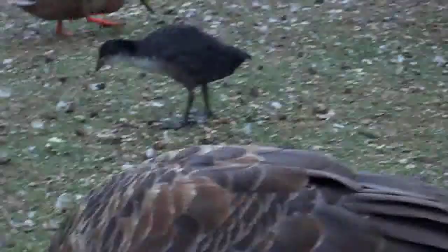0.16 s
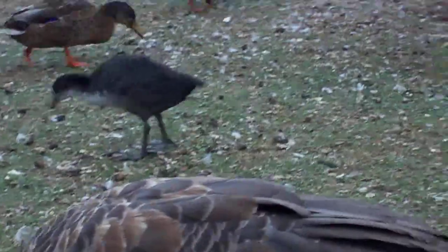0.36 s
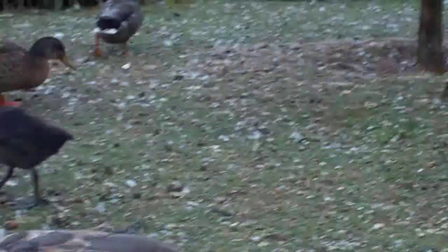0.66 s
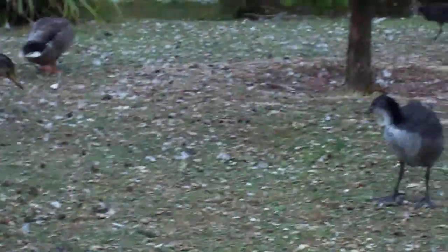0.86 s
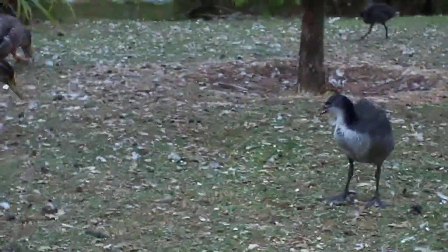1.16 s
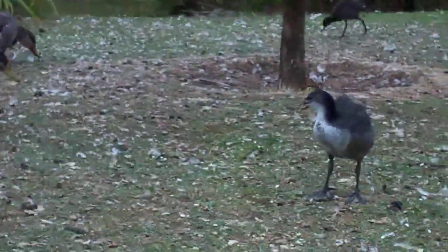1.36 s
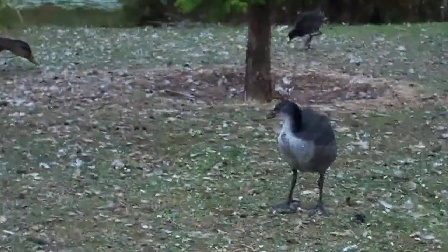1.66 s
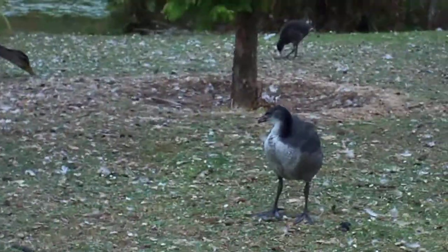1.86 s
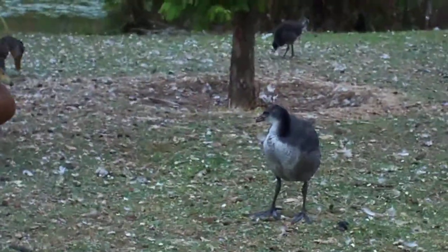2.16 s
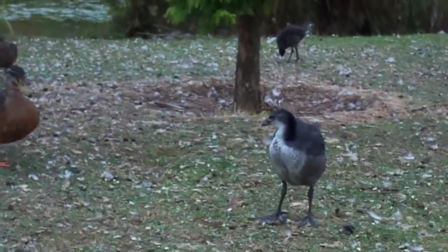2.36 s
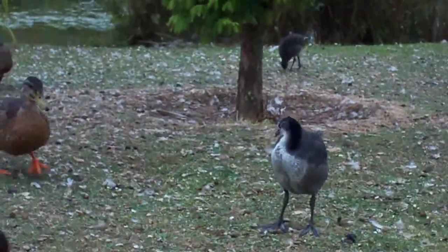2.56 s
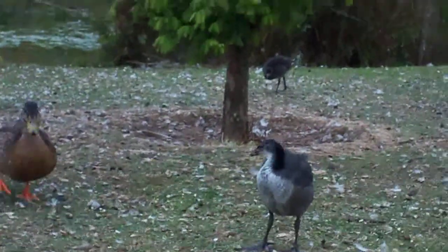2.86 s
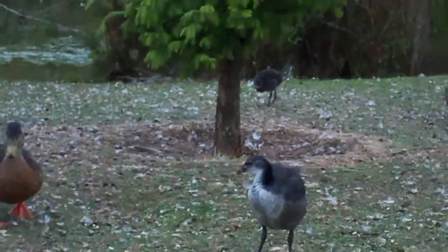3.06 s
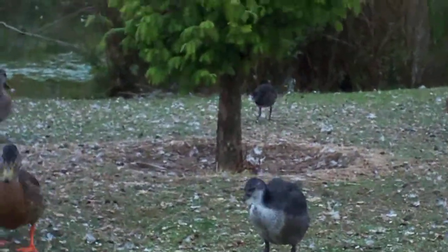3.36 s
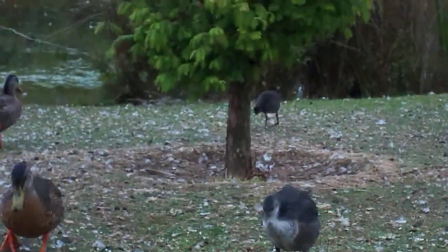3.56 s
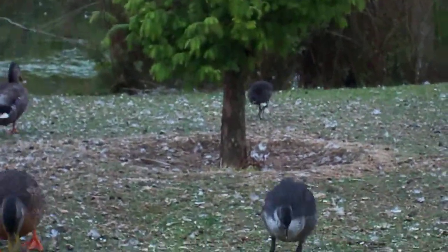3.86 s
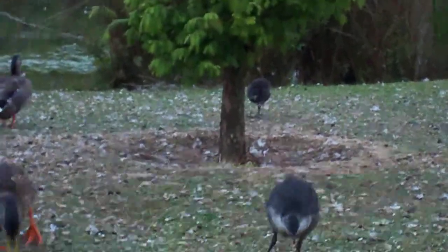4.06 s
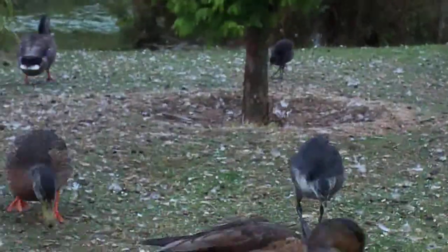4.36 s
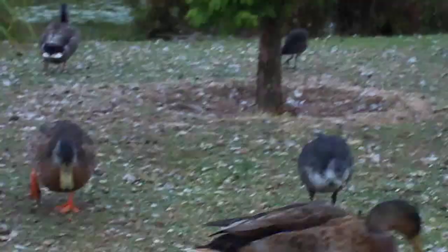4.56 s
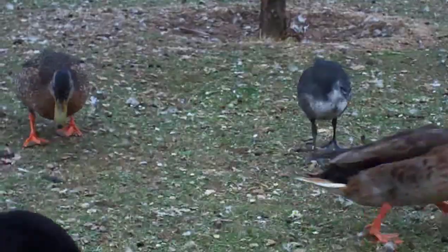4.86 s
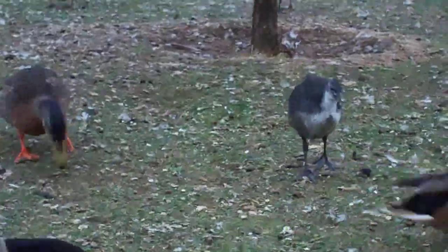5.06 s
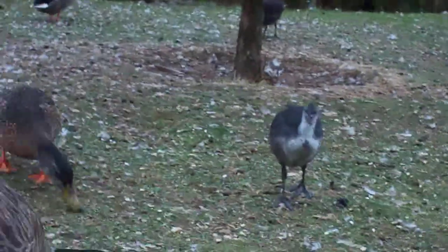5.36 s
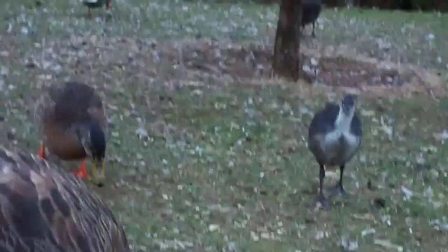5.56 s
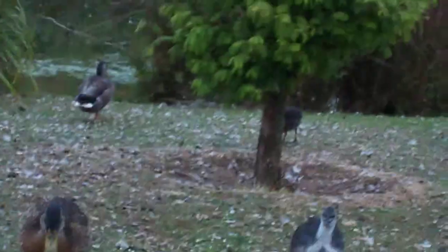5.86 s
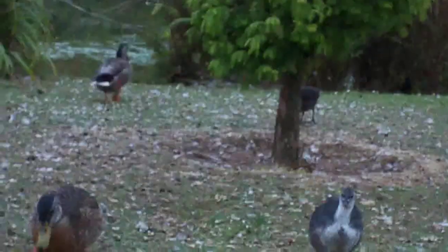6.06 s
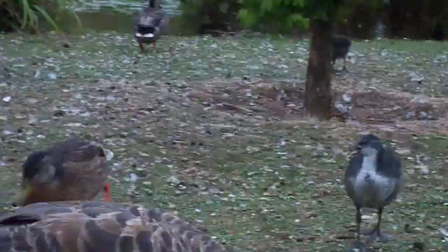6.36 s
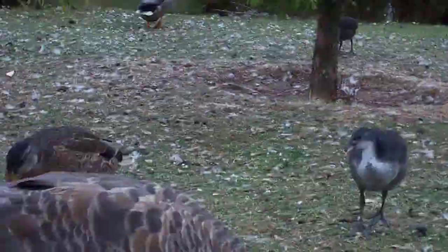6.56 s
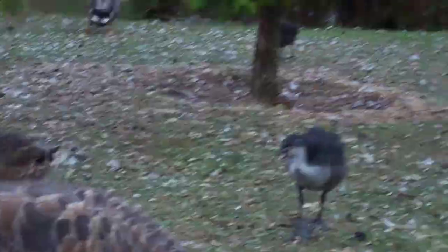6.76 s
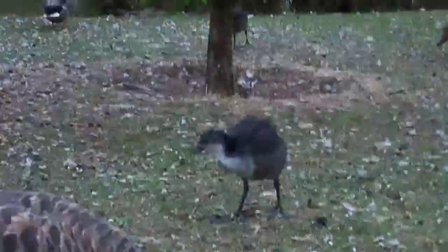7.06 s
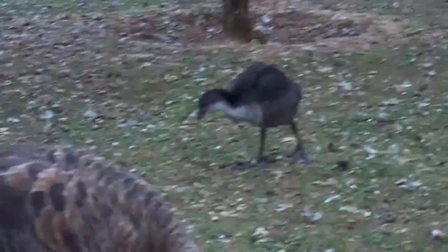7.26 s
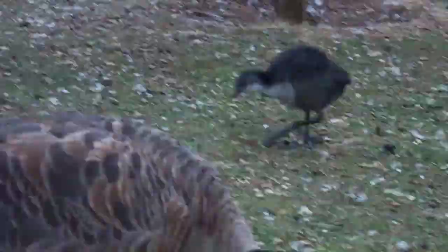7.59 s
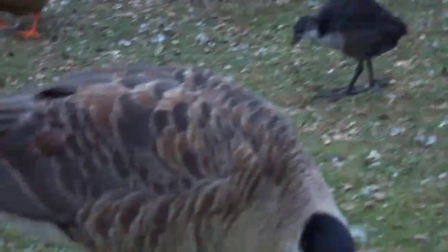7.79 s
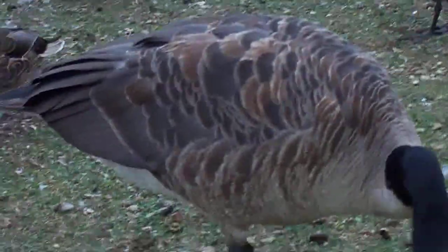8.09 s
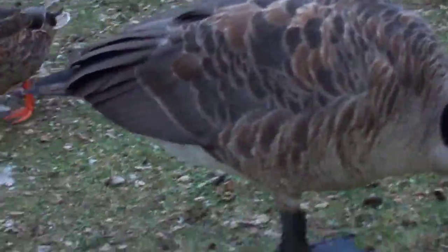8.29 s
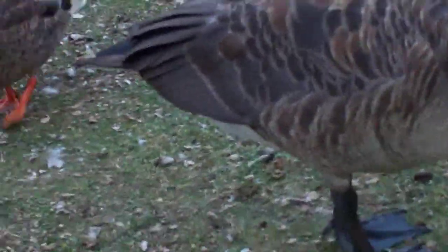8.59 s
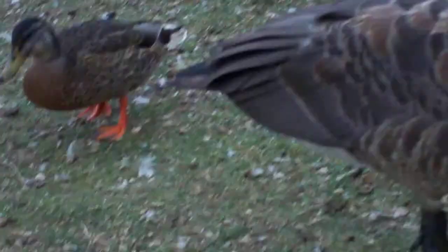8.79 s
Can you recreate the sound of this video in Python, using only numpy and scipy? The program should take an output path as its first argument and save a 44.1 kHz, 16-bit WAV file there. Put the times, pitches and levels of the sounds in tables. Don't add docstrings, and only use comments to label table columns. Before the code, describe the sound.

Young coots beg with rising whistles that rasp and drop, ducks grunt, a bill snaps, then a goose tears grass close by over low rumble.

```python
import sys
import numpy as np
from scipy import signal
from scipy.fft import rfft, irfft
from scipy.io import wavfile
from scipy.ndimage import uniform_filter1d, minimum_filter1d

SR = 44100
rng = np.random.default_rng(int(sys.argv[2]) if len(sys.argv) > 2 else 0)


def invert_db(x):
    u = np.asarray(x, float) / 20
    return 10 ** u


def store_pcm(level_fs):
    pcm = np.round(np.clip(level_fs, -1, 1) * 32767).astype(np.int16)
    wavfile.write(sys.argv[1], SR, np.atleast_2d(pcm).T)


N = 393792
T = np.arange(N) / SR

# (start [s], end [s], centre of the wandering pitch [Hz], level at the end [dB], air [dB])
RASPS = [(0.382, 0.41, 2880, -58.5, 11.5), (0.429, 0.522, 2790, -55, 6), (0.506, 0.621, 2950, -44, 0),
         (0.605, 0.774, 3204, -42, 1.5), (1.101, 1.265, 3540, -43, 0), (1.244, 1.451, 3760, -41, 1),
         (1.502, 1.558, 2470, -59.5, 8.5), (2.819, 2.89, 3140, -55.5, 10.5),
         (2.878, 3.124, 2965, -39.5, 5.5), (3.112, 3.17, 2970, -34, 6), (4.274, 4.362, 3550, -51, 9.5),
         (4.338, 4.526, 2690, -52, 13.5), (4.518, 4.555, 3530, -60, 13), (4.627, 4.676, 3410, -55, 6),
         (4.697, 4.941, 3640, -39.5, -1.5), (4.924, 5.038, 3510, -41, -3), (5.38, 5.566, 2750, -45, 2.5),
         (5.554, 5.727, 2863, -37, 3.5), (6.454, 6.806, 3640, -42, 3.5), (8.059, 8.393, 3010, -40.5, 11.5),
         (8.495, 8.594, 3520, -56.5, 12.5), (8.61, 8.83, 3170, -57.5, 0)]
CHICK_RISE_S = 0.04


def band(x, hz, width, order=1):
    edges = [max(hz - width / 2, 10), min(hz + width / 2, 0.45 * SR)]
    return signal.sosfilt(signal.butter(order, edges, "band", fs=SR, output="sos"), x)


def unit(x):
    return x / np.sqrt(np.mean(x ** 2))


def walk(rate, size=N):
    k = int(SR / rate)
    steps = np.repeat(rng.standard_normal(size // k + 2), k)
    return 1.286 * uniform_filter1d(uniform_filter1d(steps, k), k)[:size]


def colour(x, points):
    hz, db = np.transpose(points)
    bins = np.fft.rfftfreq(len(x), 1 / SR) + 1
    gain = invert_db(np.interp(np.log(bins), np.log(hz), db, -120, -120))
    return unit(irfft(rfft(x) * gain, len(x)))


def background():
    # (frequency [Hz], level [dB per Hz])
    lawn = [(82, -21.5), (140, 2), (212, -1), (280, -5.5), (601, -16.5), (656, -15.5), (740, -13.5),
            (2370, -26), (7310, -27), (8850, -30.5), (11500, -68), (19500, -120)]
    # (time [s], traffic below 90 Hz [dB], hum near 110 Hz [dB])
    rumble = [(0.0, -40.5, -55), (0.32, -38.5, -46.5), (0.4, -41.5, -67), (0.67, -40, -47.5),
              (1.41, -50, -45.5), (1.54, -38.5, -51.5), (2.19, -49.5, -44.5), (2.39, -48, -53.5),
              (3.68, -49, -43.5), (4.63, -43.5, -41), (6.91, -50.5, -58), (6.96, -54, -49.5),
              (7.44, -42, -42), (7.61, -44.5, -50), (8.58, -47.5, -46), (8.93, -46.5, -59)]
    s, road_db, hum_db = np.transpose(rumble)
    hiss = colour(rng.standard_normal(N), lawn) * invert_db(-50.5 + walk(8.7))
    road = unit(band(rng.standard_normal(N), 56.3, 36, order=2))
    wind = unit(band(rng.standard_normal(N), 28, 50, order=2)) * invert_db(-43 + 0.8 * walk(2))
    hum = np.sqrt(2) * np.sin(2 * np.pi * np.cumsum(110.6 + 1.286 * walk(3.7)) / SR)
    hum = hum + 0.5 * unit(band(rng.standard_normal(N), 108.0, 36, order=2))
    road = invert_db(np.interp(T, s, road_db) + 2.54) * road
    return hiss + wind + road + invert_db(np.interp(T, s, hum_db) + 0.5) * hum


def clicks(events, cycles, scatter, tail, contact_s=0.0001):
    out, t = np.zeros(N + 4000), np.arange(4000) / SR
    for s, db, hz in events:
        contact = -np.expm1(-(t / contact_s) ** 2)
        ring = np.sin(2 * np.pi * hz * t) * np.exp(-t * hz / cycles) * contact
        burst = scatter * np.diff(rng.standard_normal(len(t) + 1)) * np.exp(-t / tail)
        start = int(s * SR)
        out[start:start + len(t)] += invert_db(db) * (ring + burst)
    return out[:N]


def feet_and_bills():
    # (time [s], peak [dB])
    taps = [(0.483, -41), (0.816, -34), (1.682, -51), (2.277, -36), (3.762, -33.5), (4.031, -37),
            (4.31, -48), (4.648, -39)]
    # (time [s], peak [dB])
    ticks = [(1.739, -40), (1.8397, -36.5), (2.5486, -39), (2.609, -33.5), (3.565, -37.5), (3.763, -41),
             (3.911, -37.5), (3.987, -34.5), (4.04, -41), (4.052, -43), (5.152, -44), (5.166, -44.5),
             (5.228, -33), (6.115, -40.5), (6.2103, -50)]
    # (time [s], peak [dB], ring [Hz])
    snap = [
        (4.2219, -25, 1560),
        (4.2237, 11, 3490),
        (4.2252, -33, 3800),
        (5.288, -21, 2500),
    ]
    # (time [s], peak [dB], ring [Hz])
    thuds = [
        (4.2225, -23, 960),
        (4.223, -27, 220),
        (7.386, -23.5, 95.6),
        (8.603, -21, 620),
        (8.633, -23, 534),
    ]
    sound = clicks([(s, db, 950) for s, db in taps], 1.0, 0.05, 0.002)
    sound += clicks([(s, db, 5500) for s, db in ticks], 0.85, 0.45, 0.0036)
    sound += clicks(snap, 0.75, 0.011, 0.0018, contact_s=0.0003)
    return sound + clicks(thuds, 1.47, 0, 0.002)


def tearing():
    # (time [s], peak [dB], ring [Hz])
    tears = [(6.2441, -47, 1910), (6.2533, -36.5, 1020), (6.254, -25, 3820), (6.2797, -21, 3720),
             (6.3243, -26, 2160), (6.828, -27.5, 2410), (6.8955, -32.5, 1160), (6.9472, -22.5, 6840),
             (6.9556, -20.5, 4100), (6.973, -28, 2170), (6.9986, -13, 6920), (7.0475, -33.5, 1160),
             (7.0637, -31, 1000), (7.063, -31, 1270), (7.0926, -28, 2010), (7.112, -26.5, 3070),
             (7.1368, -14.5, 6900), (7.1428, -18.5, 3660), (7.1706, -29.5, 2510), (7.2083, -26.5, 2850),
             (7.2443, -18, 6200), (7.267, -19.5, 3510), (7.3005, -22.5, 4800), (7.3375, -20.5, 3740),
             (7.3568, -27, 2770), (7.411, -27.5, 1180), (7.4304, -18, 6870), (7.481, -33, 1380),
             (7.5417, -33.5, 6780), (7.5426, -24.5, 4500), (7.56, -24, 2160), (7.625, -21.5, 4650),
             (7.6387, -22, 2940), (7.683, -21.5, 5630), (7.6985, -19, 4330), (7.7289, -24.5, 4200),
             (7.744, -19.5, 4900), (7.774, -19.5, 5010), (7.8023, -39, 1010), (7.8023, -11.5, 6670),
             (7.8312, -27.5, 4800), (7.8806, -20, 5370), (7.909, -22.5, 4560), (7.929, -22, 2650),
             (6.9002, -22, 2960), (6.921, -23.5, 5500), (7.0087, -17.5, 6800), (7.028, -27.5, 4000),
                  (7.152, -24.5, 3500), (7.318, -25.5, 6500), (7.381, -22.5, 6800), (7.3908, -18, 4800),
                  (7.44, -23, 7500), (7.501, -25, 6000), (7.577, -24, 6500), (7.633, -23.5, 7300),
                  (7.7935, -22.5, 6500), (7.845, -24, 5000), (7.874, -30.5, 4500), (7.891, -32, 6000),
                  (7.947, -28, 3500), (7.958, -27.5, 6500), (7.972, -19, 2500), (7.982, -28.5, 7200),
             (8.011, -33.5, 4940), (8.078, -29.5, 7000), (8.099, -34.5, 4500), (8.145, -34.5, 6000),
                  (8.593, -16.5, 4880), (8.602, -21, 2050), (8.609, -26, 3980), (8.628, -20.5, 4870),
                  (8.633, -26.5, 2630), (8.64, -34.5, 4500)]
    return clicks(tears, 2.1, 0.78, 0.00081)


def grazing():
    fibre_hz = [500, 1300, 2600, 4400, 6800]
    # (frequency [Hz], level [dB per Hz])
    grass = [(120, -49), (200, 1.5), (279, -8.5), (645, -10.5), (1320, -6), (1750, -8.5), (2950, -7.5),
             (7160, -9.5), (8800, -17), (11400, -60.5), (19400, -120)]
    # (start [s], end [s], level [dB])
    bouts = [(6.24, 6.287, -50), (6.317, 6.535, -53.5), (6.548, 6.882, -45.5), (6.886, 6.936, -40),
             (6.94, 6.991, -47), (6.99, 7.018, -48.5), (7.045, 7.06, -62), (7.051, 7.128, -46),
             (7.128, 7.184, -41.5), (7.194, 7.351, -43.5), (7.347, 7.388, -39), (7.393, 7.524, -41.5),
             (7.524, 7.595, -42.5), (7.597, 7.645, -49), (7.633, 7.707, -42.5), (7.713, 7.745, -56),
             (7.734, 7.85, -42.5), (7.856, 7.877, -49), (7.88, 7.992, -46.5), (7.993, 8.343, -49.5),
             (8.33, 8.596, -52), (8.584, 8.847, -46), (8.593, 8.619, -35.5), (8.621, 8.643, -32.5)]
    # (time of peak [s], level [dB], build-up [s])
    tugs = [(6.279, -42, 0.018), (6.338, -43.5, 0.005), (6.782, -36.5, 0.084), (6.829, -40.5, 0.012),
            (7.009, -41.5, 0.0045), (7.066, -46, 0.0043), (7.146, -41.5, 0.0025), (7.27, -46, 0.008),
            (7.547, -38, 0.012), (7.7, -43.5, 0.011), (7.805, -50, 0.01), (7.962, -32, 0.03),
            (8.1, -41.5, 0.0053)]
    tug_decay_s = 0.036
    crackle = 0
    for hz in fibre_hz:
        chance = rng.random((3, N))
        parted = chance[0] < 700 / SR
        fibres = parted * np.sign(chance[1] - 0.5) * invert_db(-3 * np.log(chance[2] + 0.05))
        rough = unit(fibres) + 0.25 * rng.standard_normal(N)
        crackle = crackle + band(rough, hz, 0.7 * hz) * invert_db(2.5 * walk(120))
    rustle = colour(crackle, grass) * invert_db(3.2 * walk(300))
    pull = uniform_filter1d(sum(invert_db(db) * ((T > s) & (T < end)) for s, end, db in bouts), size=200)
    for s, db, build in tugs:
        pull = pull + invert_db(db) * np.exp(np.minimum((T - s) / build, (s - T) / tug_decay_s))
    return pull * rustle


def unrest():
    mask = sum((T > s) & (T < end) for s, end, *_ in RASPS)
    return uniform_filter1d(np.clip(mask, 0, 1.0), size=900)


def breaths(rises, holds, falls, rise_s, effort_db):
    x, notes, out = np.linspace(0, 1, 16), [], []
    for kind, table in enumerate([rises, holds, falls]):
        for s, length, from_hz, to_hz, db in table:
            climb = np.expm1(-x * length / rise_s) / np.expm1(-length / rise_s)
            bend = [climb, x, x ** 1.4][kind]
            hz = from_hz + (to_hz - from_hz) * bend
            notes.append(np.transpose([s + x * length, hz, db + effort_db[kind] * np.log2(hz / from_hz)]))
    for note in sorted(notes, key=lambda rows: rows[0, 0]):
        if out and note[0, 0] - out[-1][-1, 0] < 0.025:
            last = out.pop()
            note = np.vstack([last[last[:, 0] < note[0, 0]], note])
        out.append(note)

    def edge(s):
        return -2.5 * np.exp((s[0] - s) / 0.0041) - 14.5 * np.exp((s - s[-1]) / 0.015)

    return [np.transpose([s, hz, db + edge(s)]) for s, hz, db in map(np.transpose, out)]


def read(rows, fade=0.00082):
    s, *columns = np.transpose(rows)
    span = slice(int(s[0] * SR), min(int(s[-1] * SR), N))
    gate = np.clip(np.minimum(T[span] - s[0], s[-1] - T[span]) / fade, 0, 1)
    return span, gate, [np.interp(T[span], s, c) for c in columns]


def whistles(calls, catches, wobble, second_db=-15, third_db=-2):
    # (frequency [Hz], level [dB])
    windpipe = [(1250, -32), (1600, -9), (2300, -5), (3400, 0), (4300, -12), (5600, -12), (6200, -15),
                (8000, -20)]
    # (centre [Hz], width [Hz], gain [dB])
    rings = [(3800, 650, 9), (4600, 260, -3), (5040, 220, 2.5)]
    out, between, rough = np.zeros(N), np.zeros((len(catches), N)), unrest()
    for row, table in zip(between, catches):
        for start, end, db in table:
            row[int(start * SR):int(end * SR)] = invert_db(db)
    throb = 1 + 0.13 * np.sin(2 * np.pi * 155 * T)
    between = uniform_filter1d(between, 200, axis=1) * throb
    for rows in calls:
        span, gate, (hz, one_db, *two_db) = read(rows)
        size = len(hz)
        hz = uniform_filter1d(hz, 350, mode="nearest")
        jitter = wobble * (1 + 3 * rough[span]) * walk(500, size=size)
        turn = 2 * np.pi * np.cumsum(hz * (1 + jitter)) / SR
        step_db = two_db[0] - one_db if two_db else second_db
        ring_db = sum(db * np.exp(-((2 * hz - ring_hz) / width) ** 2) for ring_hz, width, db in rings)
        top_db = step_db + third_db - 7 * rough[span] + 0.092 * np.minimum(step_db, 0)
        tone = np.sin(turn) + invert_db(step_db + ring_db) * np.sin(2 * turn) + invert_db(top_db) * np.sin(3 * turn)
        for cycles, share in enumerate(between[:, span], 2):
            if not share.any():
                continue
            for m in [k / cycles for k in range(1, 4 * cycles) if k % cycles]:
                tone += share * invert_db(np.interp(m * hz, *np.transpose(windpipe))) * np.sin(m * turn)
        level = invert_db(one_db + 1.0 * walk(120, size=size))
        breath = 1 + 0.12 * walk(2500, size=size)
        out[span] += np.sqrt(2) * gate * tone * level * breath
    return out


def grunts():
    duck_grunts = [(0.553, 323, 800, -46.5, -13), (0.885, 411.3, 1050, -37, -1),
                   (2.352, 454.6, 1020, -47, -1), (2.669, 107.6, 2090, -52.5, -37),
                   (2.782, 400, 880, -49, 8.5), (3.102, 331.6, 820, -41, 8), (3.314, 110, 1770, -56, -33),
                   (3.825, 495, 1520, -54, -5), (4.11, 439, 1060, -39.5, 0), (5.454, 332, 1670, -35, -7),
                   (5.741, 294, 1915, -22.5, -11.5), (6.347, 407, 1780, -40.5, -4.5),
                   (8.314, 319.6, 760, -47.5, 14)]
    out = np.zeros(N)
    for mid, hz, mouth_hz, db, chest_db in duck_grunts:
        half = 0.015 + 1.1 / hz
        span = slice(int((mid - 2 * half) * SR), int((mid + 2 * half) * SR))
        x = (T[span] - mid) / half
        cycle = np.cumsum(hz * (1 + 0.044 * x + 0.091 * walk(300, size=len(x)))) / SR
        pulses = np.diff(np.floor(cycle), prepend=0) * invert_db(2.5 * walk(500, size=len(x)))
        pulses = unit(pulses) + invert_db(-15) * rng.standard_normal(len(x))
        glide = 0.4 * np.clip(1900 / mouth_hz - 1, 0.15, 1)
        opening = 0
        for k in np.linspace(-1, 1, 5):
            shape = band(pulses, mouth_hz * (1 + glide * k), 540, order=2)
            opening = opening + shape * np.exp(-((x - k) / 0.45) ** 2)
        mouth = opening + 0.13 * band(pulses, 500, 820) + 0.096 * band(pulses, 2800, 2600, order=3)
        chest = np.sin(2 * np.pi * cycle) + 0.37 * np.sin(4 * np.pi * cycle)
        out[span] += invert_db(db) * (unit(mouth) + invert_db(chest_db) * chest) * np.exp(-1.5 * x ** 2)
    return out


def duck_pipes():
    # (start [s], length [s], from [Hz], to [Hz], level at the start [dB])
    duck_rises = [(.82, .03, 933, 1411, -55), (.884, 0.038, 800, 1860, -44.5),
                  (.932, .022, 1570, 1800, -53), (5.398, .02, 1150, 1437, -50),
                  (5.467, 0.0137, 1130, 1450, -40), (2.345, 0.044, 832, 1570, -45.5),
                  (3.82, 0.058, 766, 1490, -41.5), (4.035, 0.0366, 862, 1380, -56),
                  (4.112, 0.045, 756, 1660, -43.5), (5.755, 0.02, 1320, 2000, -33),
                  (6.29, 0.023, 1190, 1380, -41)]
    duck_holds = [(0.498, 0.18, 1757, 1850, -53), (1.03, .028, 2530, 2700, -56),
                  (1.951, 0.046, 778, 862, -50.5), (5.48, 0.19, 1452, 1704, -52),
                  (8.148, 0.17, 1486, 1627, -46.5), (8.299, 0.063, 1650, 1620, -44.5)]
    duck_falls = [(.85, 0.022, 1416, 775, -60), (1.719, 0.041, 1114, 917, -53.5),
                  (2.31, 0.022, 1220, 842, -61), (3.8, 0.015, 1070, 764, -57),
                  (3.872, .018, 1500, 850, -64), (4.078, 0.017, 1345, 730, -60),
                  (5.421, .02, 1390, 740, -50), (5.692, 0.026, 1345, 800, -45.5)]
    pipes = breaths(duck_rises, duck_holds, duck_falls, 0.023, (-11.5, 42, -28))
    return whistles(pipes, [], 0.01, second_db=-9, third_db=-12)


def far_coot():
    # (start [s], length [s], from [Hz], to [Hz], level at the start [dB])
    far_rises = [(.746, 0.057, 2640, 1836, -34), (.965, .035, 2410, 2750, -55),
                 (1.0, 0.13, 2750, 3230, -59), (2.7, 0.031, 3430, 4620, -50),
                 (4.153, .05, 3030, 3320, -48.5), (5.37, 0.083, 3840, 3970, -51.5),
                 (6.292, 0.053, 2083, 2760, -48), (6.325, 0.071, 2860, 3290, -48.5)]
    far_holds = [(4.118, .035, 1994, 2828, -62), (5.27, .07, 2920, 3880, -90),
                 (3.126, 0.029, 2610, 3240, -48), (1.399, 0.15, 3340, 3060, -45.5),
                 (3.631, 0.195, 2350, 2424, -59), (3.89, .03, 3400, 3720, -68),
                 (3.92, .03, 3720, 3500, -60), (5.078, .055, 2280, 2400, -63),
                 (4.202, 0.12, 3316, 3298, -44), (4.307, .085, 3453, 3160, -38.5),
                 (4.388, 0.089, 3193, 3230, -40), (4.461, 0.065, 3255, 2985, -44),
                 (4.525, 0.024, 2600, 2540, -41), (4.56, 0.042, 2330, 2270, -44),
                 (2.32, .17, 2240, 2400, -67.5), (2.49, .05, 2430, 2330, -61),
                 (5.161, 0.11, 2630, 3000, -74), (5.47, .08, 4170, 4330, -56), (6.39, .29, 3284, 3690, -47),
                 (6.68, 0.039, 3640, 3600, -35.5), (6.73, .05, 3620, 3484, -35.5),
                 (8.398, 0.042, 3780, 3500, -40), (8.5, 0.087, 3620, 3600, -44.5),
                 (8.64, 0.09, 3404, 3416, -42.5)]
    far_falls = [(1.573, 0.054, 2940, 1590, -49), (4.59, 0.04, 2246, 1696, -40),
                 (6.785, 0.077, 2825, 1664, -42), (8.712, 0.04, 2680, 1840, -39.5)]
    # (start [s], end [s], lines between partials re partial 1 [dB])
    far_catch = [(0.774, 0.798, -9.5), (8.64, 8.7, -11)]
    far_thirds = [(4.398, 4.473, -5), (4.558, 4.594, -4.5)]
    far_quarters = [(1.44, 1.525, -3.5), (1.55, 1.588, -4)]
    calls = breaths(far_rises, far_holds, far_falls, CHICK_RISE_S, (6.5, 40.5, -14))
    return whistles(calls, [far_catch, far_thirds, far_quarters], 0.004)


def with_second(calls):
    rough, out = unrest(), []
    for s, hz, db in map(np.transpose, calls):
        effort = -4.5 + 0.71 * (db + 38.5)
        tight = np.clip(0.035 * (hz - 2500), 0, 9) * np.interp(s, T, rough)
        slide = 0.0006 * np.clip(minimum_filter1d(-np.gradient(hz, s), size=5), 0, 15000)
        out.append(np.transpose([s, hz, db, db + effort - tight + slide]))
    return out


def sputter():
    # (start [s], end [s], depth [0-1])
    sputters = [
        (3.2435, 3.265, .7),
        (5.045, 5.08, .6),
        (8.4815, 8.51, .9),
    ]
    gain = np.ones(N)
    for s, end, depth in sputters:
        gain -= depth * ((T > s) & (T < end)) * np.sin(np.pi * 162 * (T - s)) ** 2
    return gain


def near_coot():
    # (start [s], length [s], from [Hz], to [Hz], level at the start [dB])
    near_rises = [(.342, 0.028, 1493, 2394, -54.5), (.377, 0.081, 2380, 2730, -51),
                  (.988, 0.039, 1960, 2600, -46.5), (2.745, 0.083, 1510, 2030, -53.5),
                  (2.795, 0.2, 2200, 2640, -46), (4.606, 0.054, 1903, 2435, -47),
                  (5.308, 0.013, 1777, 1916, -52), (5.32, 0.017, 2218, 2420, -44.5),
                  (7.985, 0.062, 1860, 2500, -47.5)]
    near_holds = [(0.451, 0.12, 2750, 2550, -47), (1.072, .11, 2502, 2535, -42),
                  (1.182, .175, 2510, 2794, -42.5), (1.356, .044, 2755, 2593, -36.5),
                  (3.161, 0.053, 2326, 2283, -31), (4.932, 0.065, 2427, 2338, -36),
                  (5.7, .025, 2450, 2420, -33), (8.698, 0.074, 2725, 2480, -44),
                  (4.66, .24, 2387, 2630, -46), (5.339, 0.15, 2402, 2724, -46.5),
                  (8.06, 0.14, 2490, 2740, -46.5), (8.368, 0.023, 2445, 2536, -31),
                  (8.388, 0.021, 2506, 2518, -31), (8.414, .032, 2510, 2500, -29.5),
                  (.79, .065, 2540, 2530, -64), (.91, 0.047, 2540, 2450, -59),
                  (8.643, 0.05, 2615, 2670, -48)]
    near_falls = [(1.397, .038, 2520, 1940, -42), (1.44, 0.026, 1910, 1755, -40.5),
                  (3.21, 0.04, 2280, 2000, -32), (3.246, 0.022, 2050, 1920, -37),
                  (5.004, .042, 2340, 1854, -39), (5.048, 0.03, 1956, 1590, -42),
                  (5.737, 0.074, 2390, 2013, -32.5), (8.446, .036, 2467, 2190, -31),
                  (4.901, .032, 2635, 2448, -40.5), (8.486, 0.024, 2166, 2060, -33),
                  (8.784, 0.056, 2424, 1885, -46), (8.833, 0.031, 2017, 1630, -44)]
    # (start [s], end [s], lines between partials re partial 1 [dB])
    near_catch = [(1.12, 1.3, -1), (1.4, 1.475, 0), (3.17, 3.23, -18), (3.24, 3.265, 5.5),
                  (4.675, 4.7, 5.5), (4.933, 5.019, 2.5), (5.047, 5.076, 10.5), (5.345, 5.365, -13),
                  (5.782, 5.802, 1), (8.39, 8.44, -7), (8.48, 8.491, 6.5), (8.838, 8.853, 8.5)]
    near_thirds = [(1.087, 1.142, -8.5)]
    calls = breaths(near_rises, near_holds, near_falls, CHICK_RISE_S, (12.5, 42.5, 11.5))
    return sputter() * whistles(with_second(calls), [near_catch, near_thirds], 0.003)


def rasps():
    # (centre [Hz], width [Hz], level [dB])
    throat = [(1774, 590, -9), (2600, 750, -2.5), (3600, 900, 0), (4700, 1300, -9), (5900, 1400, -3.5),
              (7000, 1300, -5)]
    out, air = np.zeros(N), 0
    for hz, width, db in throat:
        air = air + invert_db(db) * band(rng.standard_normal(N), hz, width, order=2) / np.sqrt(width)
    air = unit(air)
    for s, end, centre_hz, end_db, air_db in RASPS:
        length = end - s
        span, gate, (t,) = read([(s, 0), (end, length)], fade=0.012)
        size = len(t)
        swell = 35 * (t - length)
        db = end_db - 2 * np.exp(-t / 0.11) + swell - 5 * np.exp((t - length) / 0.019)
        hz = centre_hz * (1 + 0.41 * (t - length / 2))
        leap = 0.08 * walk(1500, size=size) + 0.022 * walk(150, size=size)
        turn = 2 * np.pi * np.cumsum(hz * (1 + leap)) / SR
        chaos = np.sin(turn) + invert_db(-19) * np.sin(2 * turn) + invert_db(-17.0) * np.sin(0.62 * turn)
        level = invert_db(db + 0.5 * walk(150, size=size))
        out[span] += gate * level * (invert_db(8) * chaos + invert_db(air_db) * air[span])
    return out


def scene():
    lawn_sounds = background() + feet_and_bills() + tearing() + grazing()
    ducks = grunts() + duck_pipes()
    coots = far_coot() + near_coot() + rasps()
    mono = lawn_sounds + ducks + coots
    return np.array([mono, mono])


def low_pass(x):
    return signal.sosfilt(signal.butter(12, 9000, fs=SR, output="sos"), x)


def record(dry):
    inner_rate_hz, offset = 16000, -0.0098
    kept = signal.sosfilt(signal.cheby1(6, 0.5, 7650, fs=SR, output="sos"), dry)
    folded = kept * np.cos(2 * np.pi * inner_rate_hz * T)
    mirror = signal.sosfilt(signal.butter(6, 8000, "high", fs=SR, output="sos"), folded)
    leaky = kept + invert_db(-15.0) * mirror
    top = signal.sosfilt(signal.ellip(8, 0.5, 80, 8750, fs=SR, output="sos"), leaky)
    return low_pass(top + offset)


dry = scene()
out = record(dry)
store_pcm(out)
```